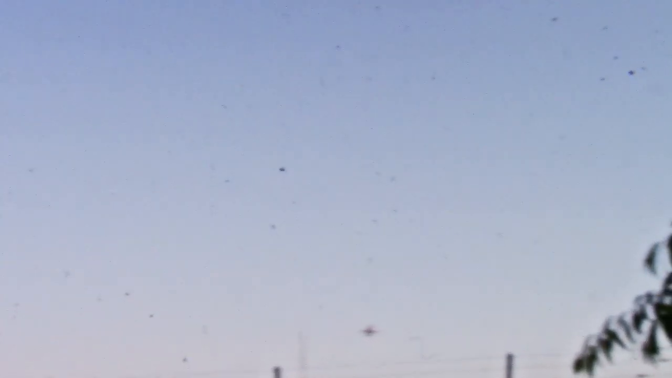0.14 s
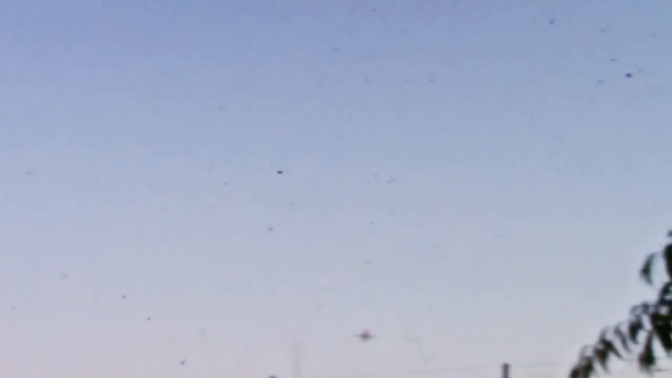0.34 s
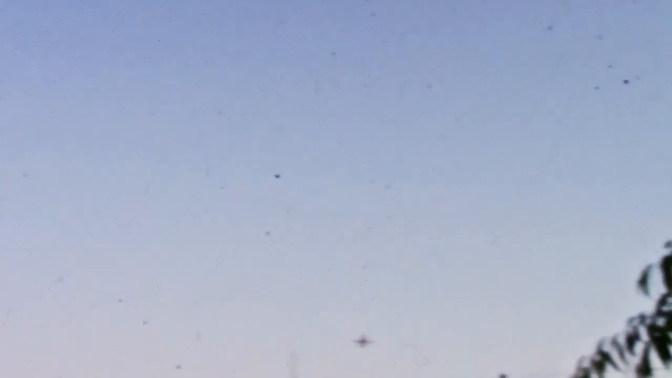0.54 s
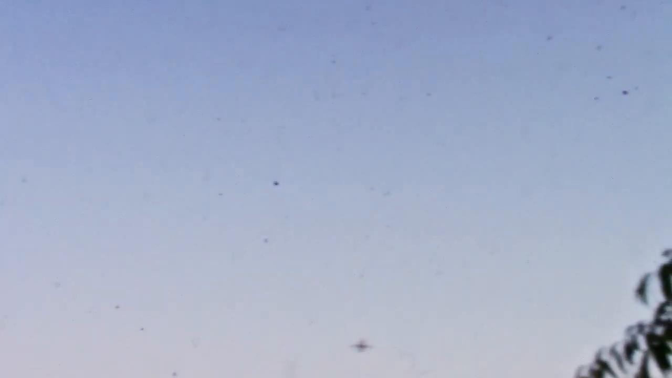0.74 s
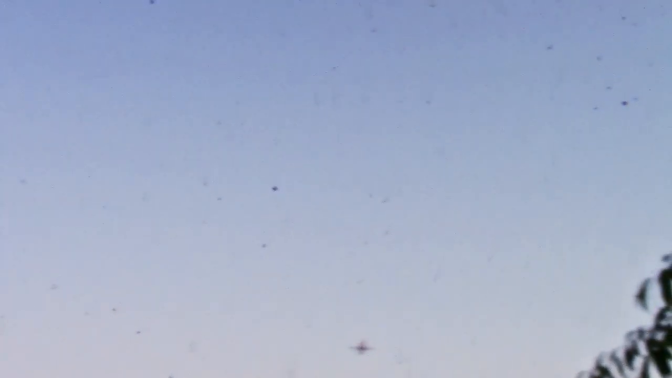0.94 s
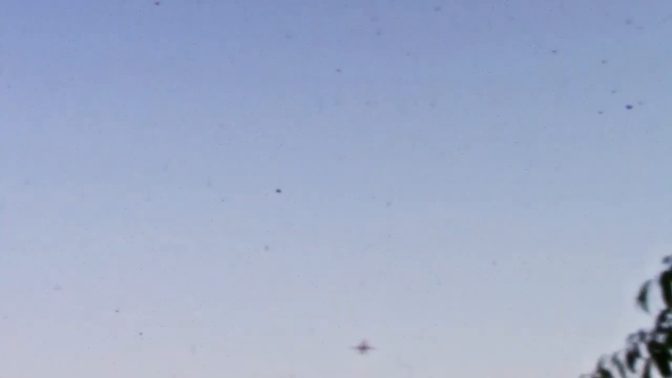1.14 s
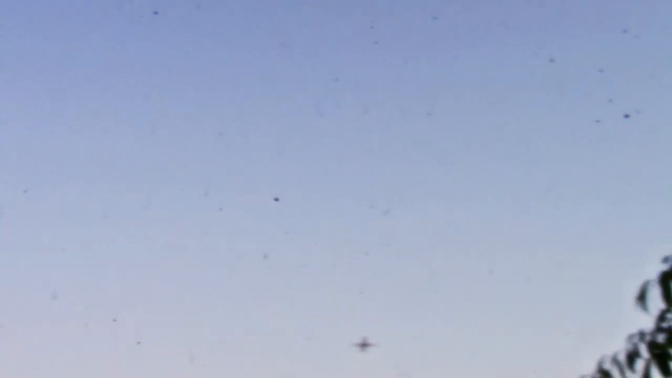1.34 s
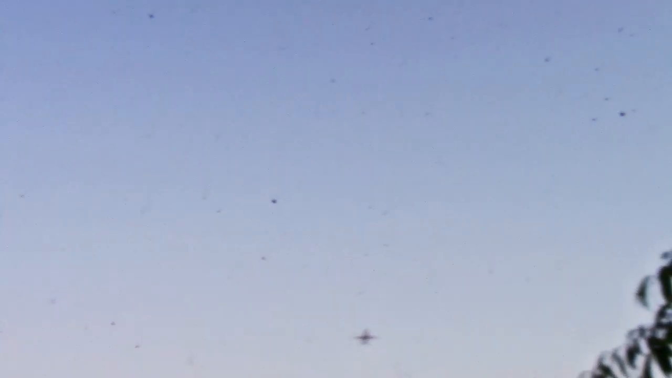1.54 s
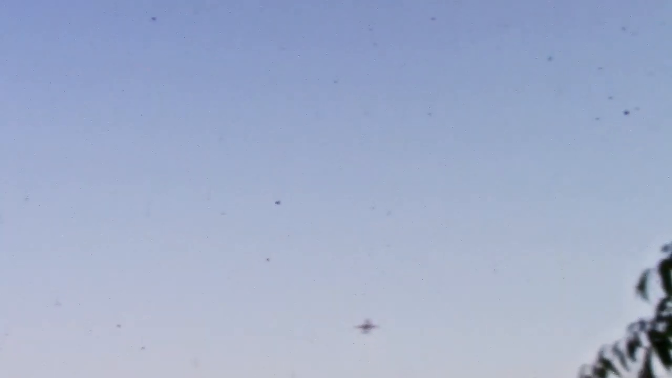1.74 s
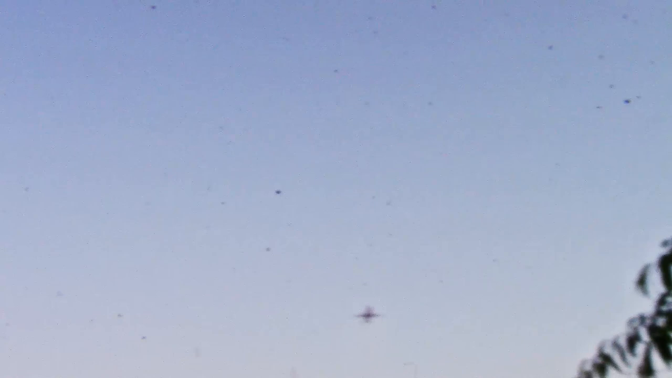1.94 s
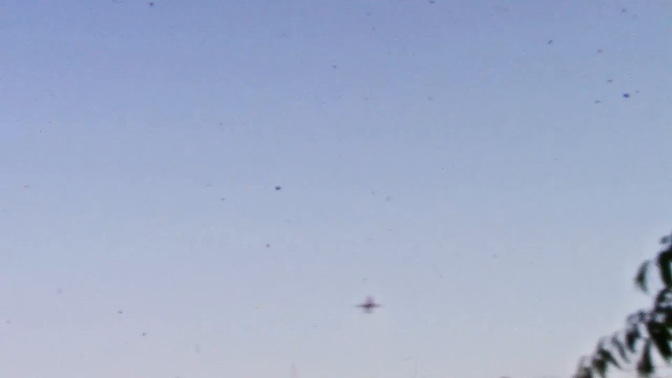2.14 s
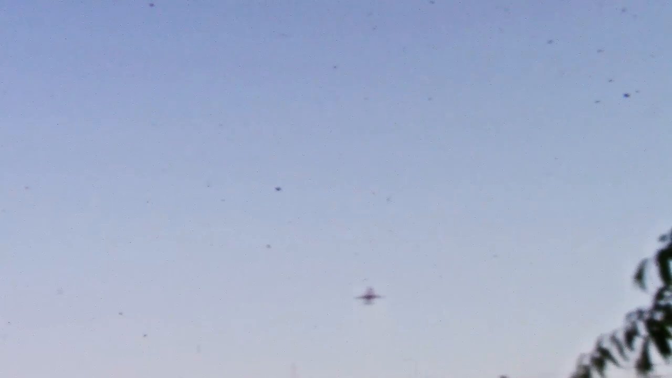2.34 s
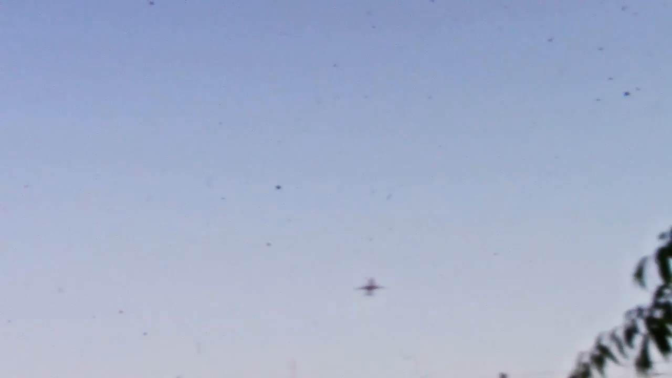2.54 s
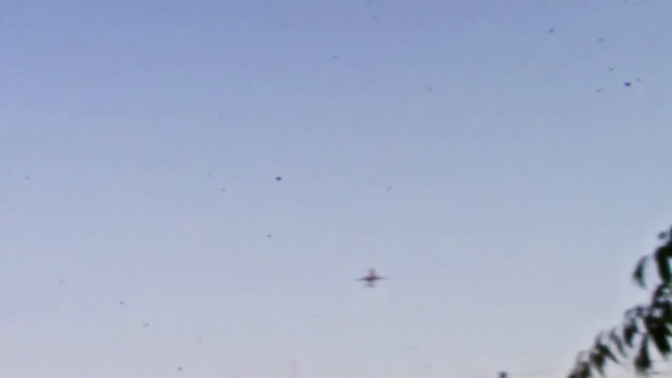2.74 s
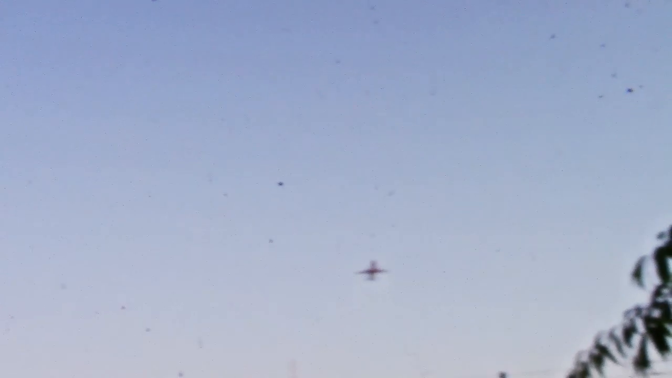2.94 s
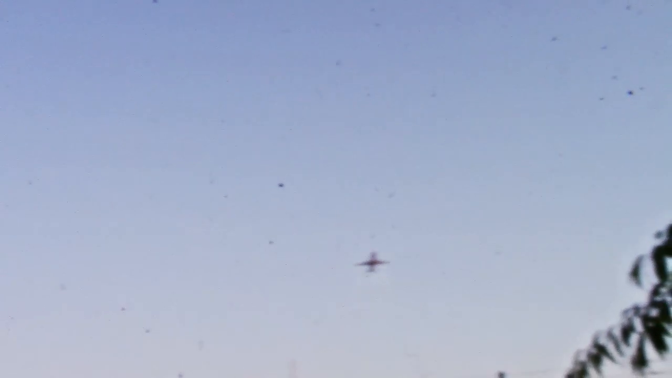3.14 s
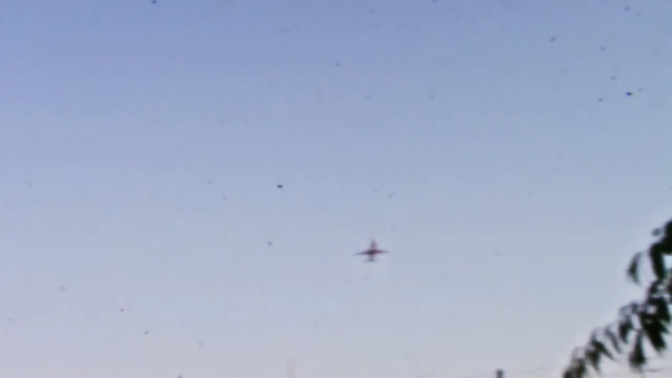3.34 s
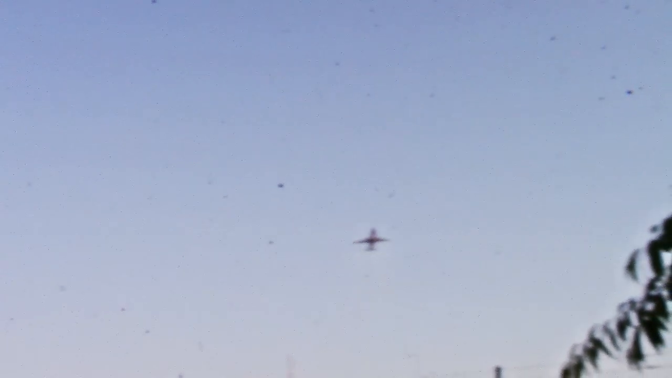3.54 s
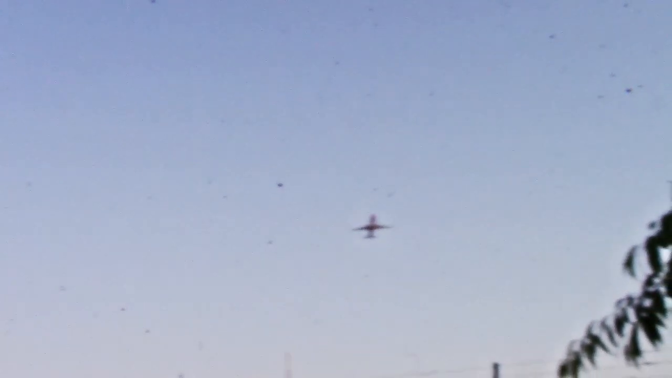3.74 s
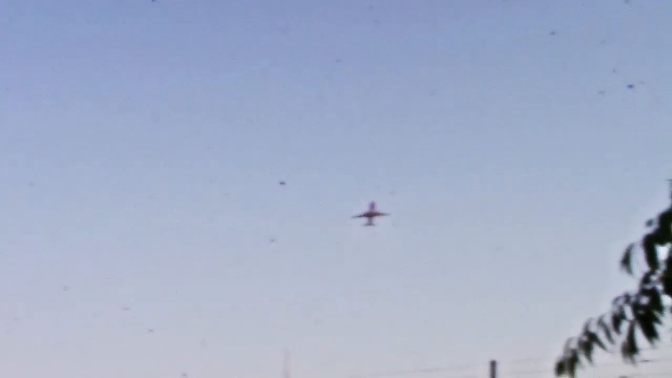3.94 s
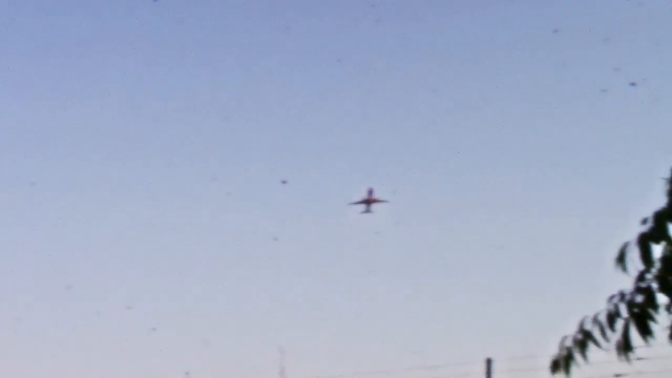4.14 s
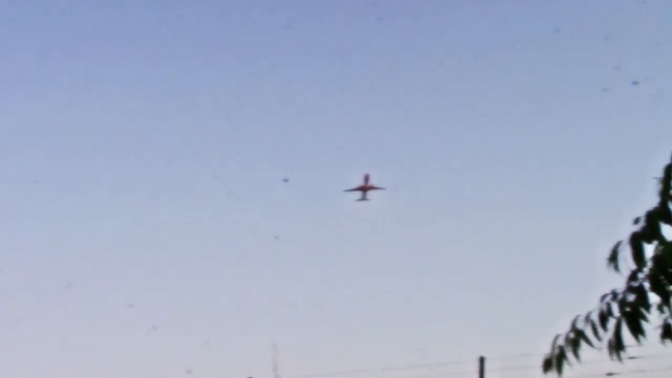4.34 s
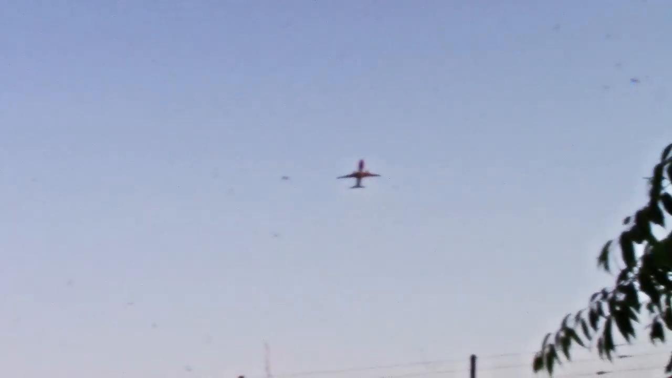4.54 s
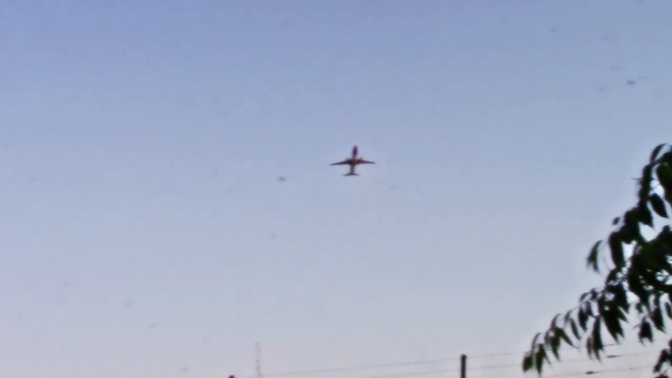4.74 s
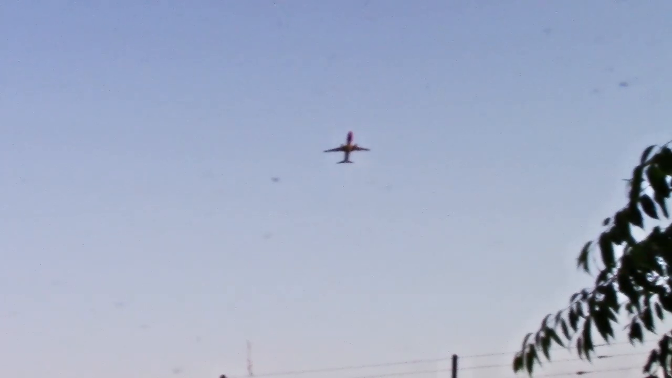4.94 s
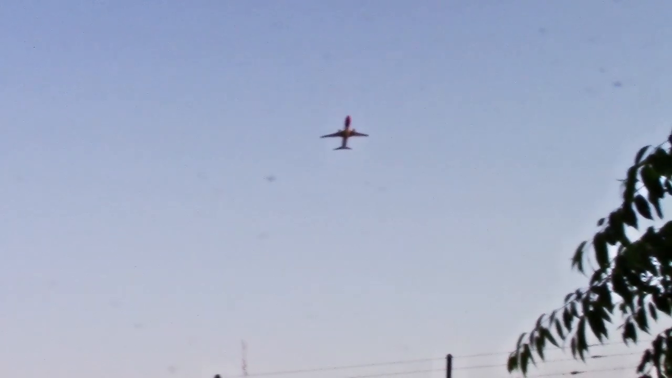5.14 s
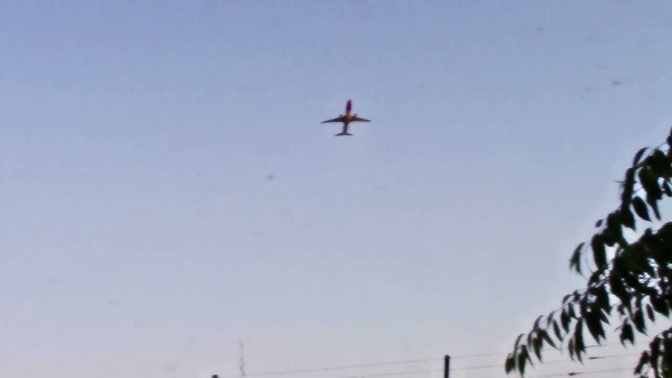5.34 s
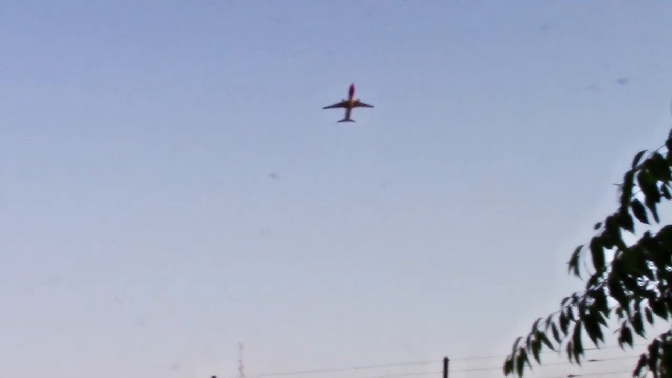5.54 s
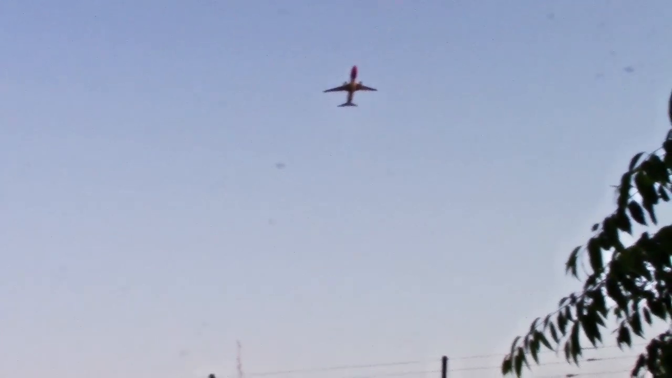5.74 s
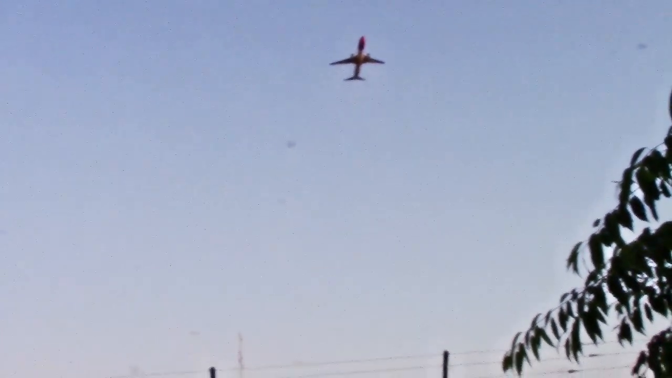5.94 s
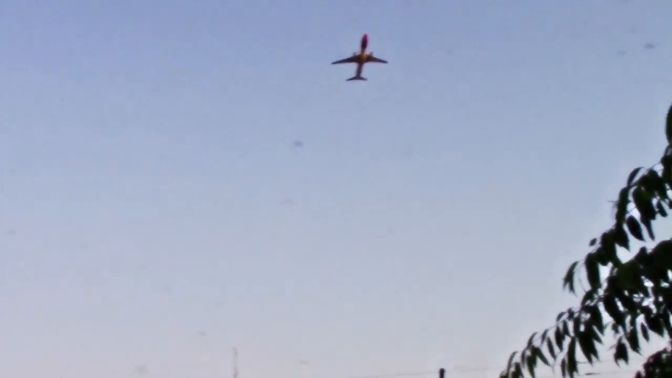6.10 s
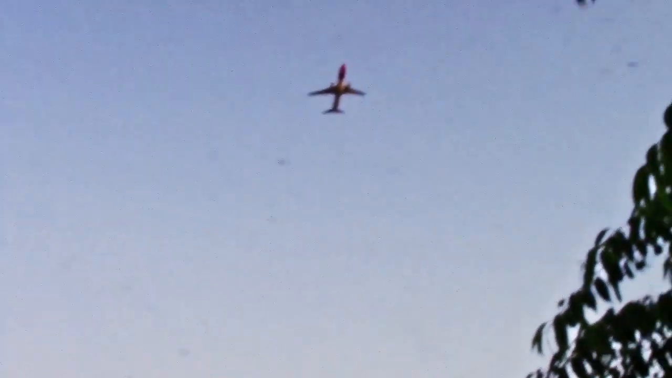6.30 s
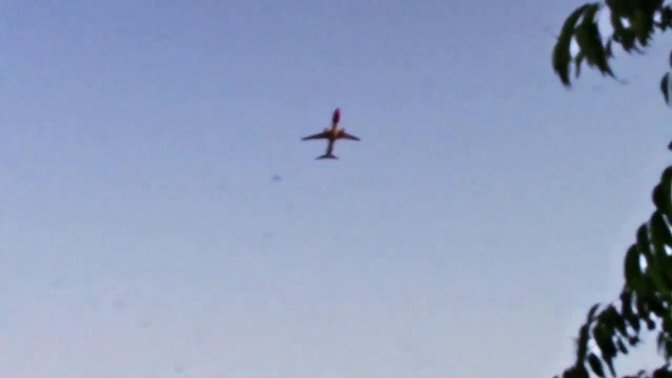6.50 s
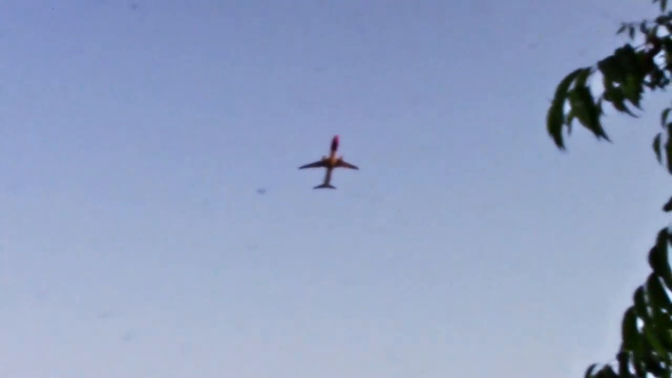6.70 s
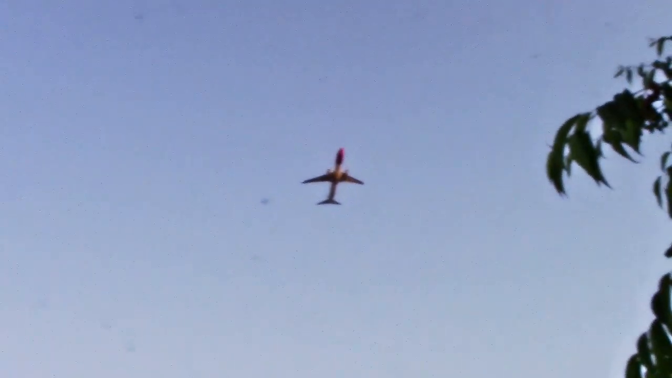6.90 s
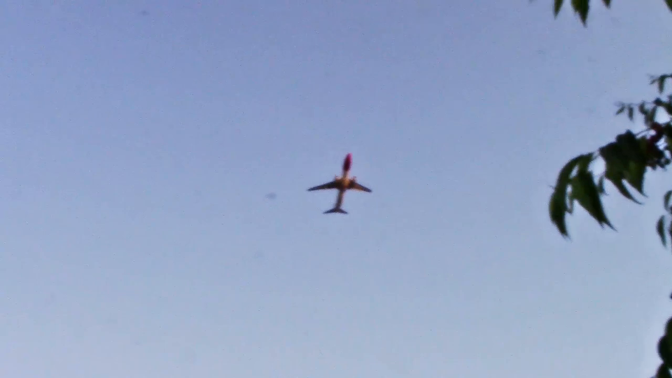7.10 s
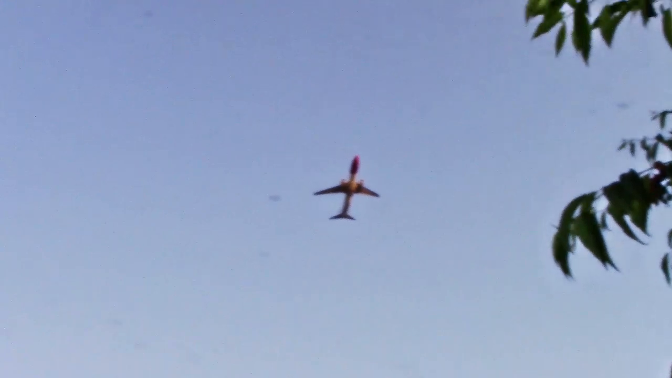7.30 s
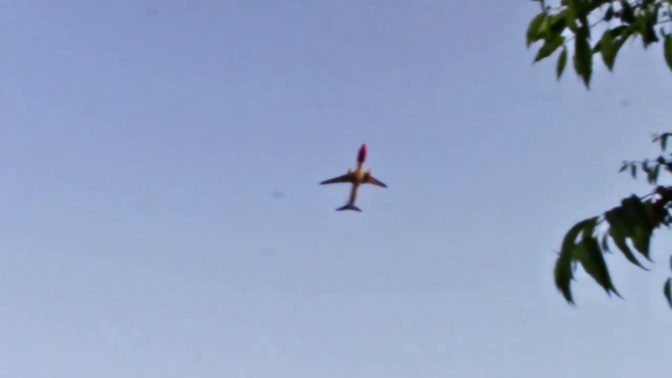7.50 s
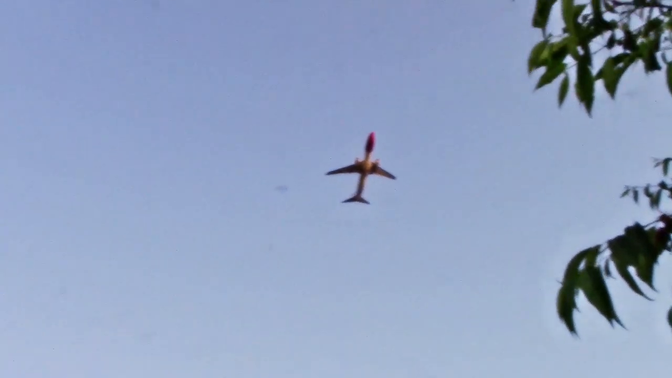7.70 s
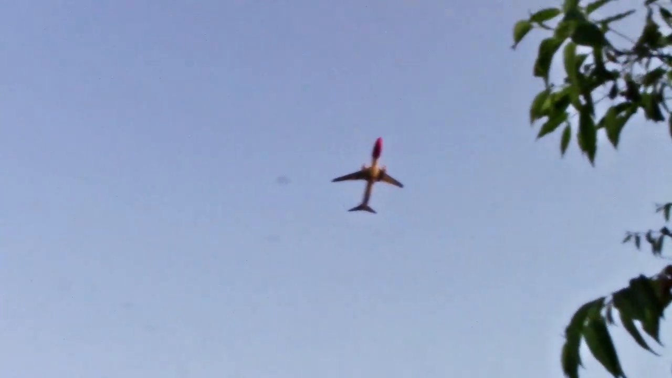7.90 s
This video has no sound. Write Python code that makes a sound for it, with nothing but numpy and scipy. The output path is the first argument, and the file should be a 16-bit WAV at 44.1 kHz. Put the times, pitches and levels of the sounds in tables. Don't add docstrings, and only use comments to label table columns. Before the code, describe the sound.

A small handheld microphone in the open catches a jet airliner climbing closer. Its grainy broadband roar and steady buzz-saw drone flutter with the wind, surging and dipping. Tiny high bird ticks are barely audible midway. The roar then builds, gaining crisp treble and a piercing whine, its hollow phasing colour sweeping downward as the pitch drops a little. Peaks crunch softly, and the sound ends still loud, without fading away.

```python
import sys
import numpy as np
from scipy import signal
from scipy.fft import rfft, irfft, next_fast_len
from scipy.io import wavfile
from scipy.ndimage import uniform_filter1d, map_coordinates

SR = 44100
rng = np.random.default_rng(int(sys.argv[2]) if len(sys.argv) > 2 else 0)


def ratio_of_db(decibels):
    return 10 ** (np.asarray(decibels, float) / 20)


def unload_wav(signal):
    wavfile.write(
        sys.argv[1],
        SR,
        np.round(np.clip(np.atleast_2d(signal).T, -1, 1) * 32767).astype(np.int16),
    )


N = 355446
DURATION_S = N / SR

# start_s [s], shaft_hz [turns/s]
SHAFT_SPEED = [(0, 99.04), (.5, 99.04), (1, 98.7), (1.5, 99.05), (2.5, 99.2), (3, 98.9), (3.6, 99.03),
               (4.05, 98.45), (4.5, 98.38), (5, 97.9), (5.5, 97.05), (6, 96.25), (6.5, 95.56),
               (6.75, 94.45), (7, 93.6), (7.5, 92.39), (8.06, 90.26)]
# start_s [s], lag_ms [ms]
ECHO_DELAY = [(0, 1.2), (1.5, 1.25), (2.5, 1.42), (3.5, 1.66), (4, 1.8), (5, 2.36), (6, 2.92), (6.5, 3.37),
              (7, 3.8), (7.5, 4.7), (8.06, 5.4)]
# centre_s [s], half_length_s [s], level_db [dB]
AIR_GUSTS = [(0.42, 0.25, -5), (0.88, 0.34, -4), (1.64, 0.9, 4), (2.24, 0.15, 4), (2.82, 0.47, -3.5),
             (3.62, 0.18, 3), (4.2, 0.11, 3), (4.56, 0.15, 1), (4.97, 0.23, 1.5), (5.48, 0.16, -4.5),
             (5.79, 0.1, 5.5), (6.0, 0.12, -0.7), (6.16, 0.1, 1.5), (6.42, 0.18, 3), (6.62, 0.045, -1.5),
             (6.8, 0.08, 1.3), (6.85, 0.11, 1.35), (7.06, 0.08, -1.5), (7.26, 0.11, 2.5), (7.95, 1, -3.5)]


def airliner():
    # start_s [s], strength [0-1]
    reflection = [(.8, .25), (1.6, .4), (3.3, .66), (4.1, .32), (4.8, .35), (5.6, .55), (6.2, .72),
                  (7, .74), (7.35, .52), (7.8, .68)]
    t = np.arange(N) / SR
    turns = np.cumsum(curves(SHAFT_SPEED, t)[0]) / SR
    roar = ground(engines(turns, t), t, curves(reflection, t)[0])
    return air(roar) + ground(whine(turns, t), t, strength=0.62)


def engines(turns, t):
    # shaft_order [-], far_db [dB], overhead_db [dB]
    buzz_saw = [(12, -28, -29), (14, -27, -25), (15, -30, -27), (16, -31, -40), (17, -30, -33),
                (18, -27, -26), (19, -30, -30), (21, -33, -30), (22, -33, -25), (23, -32, -27),
                (25, -30, -25), (26, -28, -25), (27, -31, -31), (29, -40, -26), (30, -40, -24),
                (31, -35, -27), (32, -36, -27), (33, -35, -28), (35, -29, -33), (39, -27, -30),
                (42, -31, -30), (45, -33, -28), (47, -31, -30), (54, -33, -29)]
    near = approach(t)
    out = rng.standard_normal(N)
    for order, far_db, near_db in buzz_saw:
        level_db = far_db + (near_db - far_db) * near + 2.5 * wobble(2)
        out = out + ratio_of_db(level_db) * tone(turns, order, steady=.5, rate=4 + order / 2)
    return out


def whine(turns, t):
    # shaft_order [-], far_db [dB], overhead_db [dB]
    fan_tones = [(6, -25.5, -24), (10, -24.5, -45), (11, -23, -28), (13, -31, -26), (24, -24.5, -20),
                 (34, -44, -34.5), (38, -46, -31), (48, -59, -46.5)]
    # centre_s [s], half_length_s [s], level_db [dB]
    blade_twinkle = [(0.19, 0.57, -5), (0.53, 0.12, 5), (0.8, 0.047, -12), (1.4, 0.3, -4.5),
                     (2.01, 0.15, -7), (2.18, 0.063, 10.8), (2.77, 0.06, -22), (3.0, 0.48, 6.5),
                     (3.25, 0.21, -10), (3.37, 0.036, 12.5), (3.92, 0.13, -14), (4.05, 0.28, 7),
                     (4.64, 0.091, 9), (5.1, 0.099, -17), (5.21, 0.055, 11.5), (5.35, 0.047, -14),
                     (5.8, 0.11, 4), (5.97, 0.08, -10.5), (6.41, 0.34, -9), (6.97, 0.15, 5.5),
                     (7.55, 0.083, -13), (7.58, 0.19, 0), (7.77, 0.03, -14), (8.02, 0.053, 10.5)]
    # centre_s [s], shaft_order [-], half_length_s [s], level_db [dB]
    tone_swells = [(0.11, 6, 0.42, -4), (3, 6, 0.064, 6.9), (3.517, 6, 0.062, 6.5), (6.178, 6, 0.093, 2),
                   (7.313, 6, 0.49, -5.5), (7.59, 6, 0.14, 6.5), (0.44, 10, 0.63, -8),
                   (1.73, 10, 0.077, 7.5), (3.0, 10, 0.12, 5), (3.19, 10, 0.1, -11), (7.84, 10, 0.12, 16.5),
                   (0.497, 11, 0.096, 6.5), (1.706, 11, 0.072, 10.2), (2.42, 11, 0.21, -20),
                   (3.39, 11, 0.13, -9), (6.415, 11, 0.13, -1), (7.444, 11, 0.16, 7.5),
                   (0.285, 13, 0.2, 13.5), (5.984, 13, 0.31, -12), (6.692, 13, 0.078, -9),
                   (7.656, 13, 0.087, 6.5), (3.57, 34, 0.22, 8.5), (4.19, 34, 0.084, 7),
                   (4.717, 34, 0.092, -9), (5.91, 34, 0.085, -4), (1.07, 38, 0.12, 4),
                   (5.706, 38, 0.075, -16), (7.173, 38, 0.12, 0), (7.67, 38, 0.18, 9),
                   (4.5, 48, .9, 6.5), (2.4, 48, .9, 2.5), (4.3, 10, 0.53, 5.5), (4.3, 11, 0.67, 0.5),
                    (1.24, 10, 0.15, 7), (5.5, 38, .4, -4), (3.22, 6, 0.093, -4), (5.7, 11, .3, 2.5),
                    (6.14, 24, 0.04, 7), (6.57, 24, .05, 5.5), (6.74, 24, .05, -2), (6.9, 24, .05, 3.5),
                    (2.9, 24, .12, 0.5), (3.5, 24, .06, 2), (7.68, 24, .06, -3.5), (1.7, 10, .1, 1.5),
                    (7, 38, 0.72, -2.5), (1.2, 48, .9, 2.5), (3.3, 48, .5, 3.5), (.25, 13, .12, -3),
                    (6.15, 11, .12, -4.5), (1.45, 6, .1, 5), (4.5, 6, .4, 2.5), (6.4, 38, .15, -3.5),
                    (7.85, 38, .1, 4)]
    blades = 24
    s = np.linspace(0, DURATION_S, 900)
    near = approach(s)
    shaft_hz = curves(SHAFT_SPEED, s)[0]
    out = 0
    for order, far_db, near_db in fan_tones:
        own = [(a, half, db) for a, k, half, db in tone_swells if k == order]
        if order == blades:
            own = [*blade_twinkle, *own]
        level_db = far_db + (near_db - far_db) * near + bumps(own, s) + path_db(order * shaft_hz, s)
        steady = .86 if order == blades else .9 - order / 100
        out = out + ratio_of_db(np.interp(t, s, level_db)) * tone(turns, order, steady, 5 + .8 * order)
    return out


def tone(turns, order, steady, rate):
    scattered = unit(wobble(rate) + 1j * wobble(rate))
    carrier = np.exp(2j * np.pi * order * turns + 1j * wobble(rate))
    return np.sqrt(2) * np.real(carrier * (np.sqrt(steady) + np.sqrt(1 - steady) * scattered))


def approach(t):
    return np.clip((t - 2.5) / 4, 0, 1)


def ground(x, t, strength):
    dull = coloured(x, [(600, 0), (1400, -3), (2600, -10), (5000, -22)])
    lag_ms = curves(ECHO_DELAY, t)[0] + .015 * wobble(5)
    echo = map_coordinates(dull, [np.arange(N) - lag_ms * SR / 1000], order=1, mode="nearest")
    return x + strength * echo


def air(x):
    # frequency_hz [Hz], level_db [dB per Hz]
    jet_spectrum = [(60, -70.5), (115, -16), (165, -15), (250, -3.5), (400, -5), (650, 1), (1300, -4),
                    (2100, -5), (3500, -13), (6300, -20), (9000, -36), (10500, -53.5), (12500, -70.5)]
    # centre_s [s], half_length_s [s], level_db [dB]
    treble_sparkle = [(2.6, 0.75, 2), (3.64, 0.024, 3.5), (4.6, 0.048, 5), (5.6, .1, 0.5), (5.98, 0.086, 1),
                      (6.12, 0.038, 2), (6.63, 0.048, -1.5), (6.76, 0.041, 1.5), (7.05, 0.072, -0.5),
                      (7.25, 0.079, 3.5), (7.44, .06, -1.5), (7.56, 0.024, 2.5), (7.65, .06, 3),
                      (7.79, 0.036, -2), (7.9, 0.064, 2), (8.02, 0.085, 1.5)]
    loss_db_per_km, power, knee_hz = 8.5, 2.25, 7060
    hz, t, z = signal.stft(x, SR, nperseg=1024)
    f = hz[:, None]
    loss_per_km = loss_db_per_km * (f / 4000) ** power / np.hypot(1, (f / knee_hz) ** power)
    loss_db = loss_per_km * (distance_km(t) - distance_km(DURATION_S))
    patches = rng.standard_normal(z.shape)
    for axis in (0, 1):
        patches = uniform_filter1d(patches, size=14, axis=axis)
    gain_db = along(jet_spectrum, hz)[:, None] + path_db(f, t) - loss_db + 0.89 * unit(patches)
    shimmer = .7 * wobble(9) + 1.1 * wobble(20)
    shimmer = shimmer[np.minimum(t * SR, N - 1).astype(int)]
    treble_share = along([(1200, 0), (4000, 1)], hz)[:, None]
    gain_db = gain_db + (shimmer + bumps(treble_sparkle, t)) * treble_share
    return signal.istft(z * ratio_of_db(gain_db + 0.28), SR, nperseg=1024)[1][:N]


def path_db(hz, t):
    # centre_s [s], frequency_hz [Hz], half_length_s [s], level_db [dB]
    octave_eddies = [(1.08, 780, 0.58, -5.5), (1.39, 1080, 0.15, 3), (2.31, 6040, 0.23, -4),
                     (2.52, 925, 0.23, -3.5), (3.644, 1130, 0.14, -5.5), (3.994, 690, 0.067, -2.5),
                     (5.31, 410, 0.16, -0.5), (5.32, 990, 0.3, 4), (5.888, 1570, 0.19, -5),
                     (6.316, 500, 0.26, 4.5), (7.398, 810, 0.39, -2), (.01, 3170, .16, 3.5),
                     (0.186, 810, 0.034, -5), (.77, 300, 0.18, -5), (1.4, 470, 0.14, 5),
                     (1.55, 300, 0.36, -5.5), (2.01, 1160, .12, -4), (2.04, 490, .17, 5.5),
                     (2.2, 1500, .1, 3.5), (2.59, 340, 0.16, 3.5), (3.35, 1730, .12, -5.5),
                     (3.66, 300, 0.39, 3), (4.38, 300, 0.095, 4), (4.54, 1340, .16, 3.5),
                     (6.17, 750, 0.12, 2), (5.754, 750, 0.069, 0.5), (6.8, 4000, .1, 3),
                     (7.09, 310, 0.1, 2.5), (7.58, 540, 0.36, 2), (6.85, 550, 0.052, -2.5)]
    spread = -20 * np.log10(distance_km(t) / distance_km(DURATION_S))
    gust_share = along([(200, .55), (600, 0.97), (2000, 1), (5000, 1.08)], hz)
    level_db = spread + bumps(AIR_GUSTS, t) * gust_share
    for s, mid_hz, half, db in octave_eddies:
        octaves = np.log2((hz + 1) / mid_hz)
        level_db = level_db + bumps([(s, half, db)], t) * np.exp(-(octaves / 0.55) ** 2)
    return level_db


def distance_km(t):
    altitude_m, mic_height_m, sound_m_per_ms = 300, 1.43, .343
    path_difference_m = curves(ECHO_DELAY, t)[0] * sound_m_per_ms
    return altitude_m * 2 * mic_height_m / path_difference_m / 1000


def bird():
    # start_s [s], pitch_hz [Hz], length_s [s], level_db [dB]
    ticks = [
        (3.535, 7500, .03, -61),
        (3.665, 7620, .02, -59),
        (3.69, 7600, 0.031, -58),
        (3.815, 7640, .06, -60),
    ]
    out = np.zeros(N)
    for s, hz, length, db in ticks:
        u = np.linspace(0, 1, int(length * SR))
        cycles = hz * length * (u - .006 * u * u)
        out[int(s * SR):][:len(u)] += ratio_of_db(db) * np.sin(np.pi * u) * np.sin(2 * np.pi * cycles)
    return out


def heath():
    # frequency_hz [Hz], level_db [dB per Hz]
    rumble_spectrum = [(30, -23), (60, -11.5), (100, -1.5), (150, -4), (220, 5), (330, -19.5), (600, -37),
                       (2000, -120)]
    # frequency_hz [Hz], level_db [dB per Hz]
    murmur_spectrum = [(30, -20), (60, -6), (100, 5.5), (140, -11), (300, -60)]
    t = np.arange(N) / SR
    level_db = np.interp(distance_km(t), (.5, 2), (-65, -38.5))
    level_db = level_db + 0.56 * bumps(AIR_GUSTS, t) + 0.5 * wobble(4)
    return ratio_of_db(level_db) * noise(rumble_spectrum) + ratio_of_db(-45.5) * noise(murmur_spectrum)


def noise(spectrum):
    return unit(coloured(rng.standard_normal(N), spectrum))


def coloured(x, spectrum):
    m = next_fast_len(N + 8192)
    return irfft(rfft(x, m) * ratio_of_db(along(spectrum, np.fft.rfftfreq(m, 1 / SR))), m)[:N]


def wobble(rate):
    return map_coordinates(rng.standard_normal(900), [np.arange(N) * rate / SR])


def bumps(rows, t):
    return sum((db * np.exp(-((t - s) / half) ** 2) for s, half, db in rows), 0 * t)


def unit(x):
    return x / np.sqrt(np.mean(np.abs(x) ** 2) + 1e-20)


def along(points, hz):
    f, v = np.transpose(points)
    return np.interp(np.log(hz + 1), np.log(f + 1), v)


def curves(rows, t):
    s, *cols = np.transpose(rows)
    return [np.interp(t, s, c) for c in cols]


def scene():
    return (airliner() + heath() + bird())[None]


def roll_off(x):
    return signal.sosfilt(signal.butter(12, 12900, fs=SR, output="sos"), x)


def record(dry):
    # frequency_hz [Hz], level_db [dB]
    bass_cut = [(30, -40.5), (70, -22.5), (110, -9.5), (150, 1.5)]
    # frequency_hz [Hz], level_db [dB]
    band_limit = [(9500, 0), (11500, -2), (12600, -6), (14000, -40)]
    # frequency_hz [Hz], level_db [dB per Hz]
    hiss_spectrum = [(20, 1.5), (200, -2.5), (4000, 10.5), (9000, -1), (11500, -2), (13000, -32),
                     (16000, -76)]
    x = coloured(dry[0], bass_cut) * np.clip(np.arange(N) / 150, 0, 1)
    top = np.where(x > 0, .97, .965)
    x = x / (1 + np.abs(x / top) ** 6) ** (1 / 6)
    x = coloured(x, band_limit) + ratio_of_db(-58.5) * noise(hiss_spectrum)
    return roll_off(x[None])


dry = scene()
out = record(dry)
unload_wav(out)
```